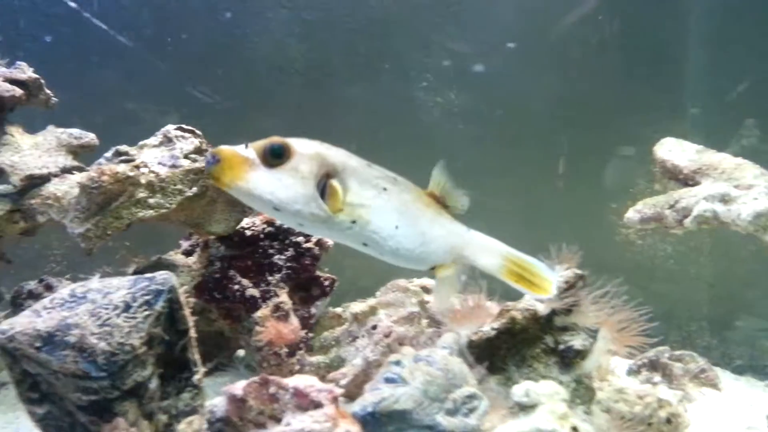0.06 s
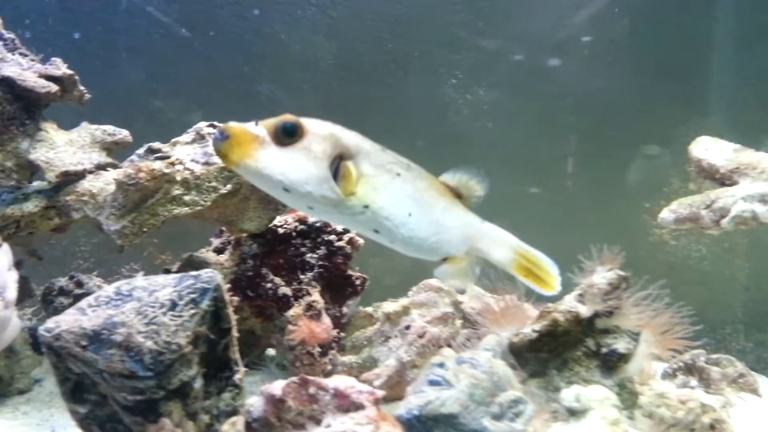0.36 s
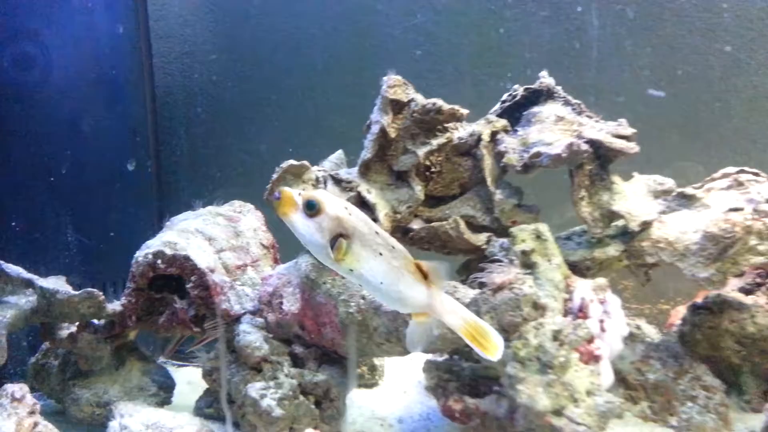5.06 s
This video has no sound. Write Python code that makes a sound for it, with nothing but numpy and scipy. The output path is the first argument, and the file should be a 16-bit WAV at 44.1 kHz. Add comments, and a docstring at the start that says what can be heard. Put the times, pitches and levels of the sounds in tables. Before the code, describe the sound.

Close to a fish tank, running water bubbles and splashes lightly onto the surface while a pump hums softly underneath.

```python
"""A small room with an aquarium, heard close to the glass. The circulation pump hums at harmonics of the
mains. Return water churns and gulps in the overflow and trickles onto the surface, where each trapped
bubble rings as a damped oscillator: a steady fizz, with a louder plip or a bright spatter now and then.
The space under the hood resonates, the panes reflect and the room adds a short reverberation."""
import sys
import numpy as np
from scipy import signal
from scipy.fft import rfft, irfft, next_fast_len
from scipy.io import wavfile
from scipy.ndimage import map_coordinates

SR = 44100
rng = np.random.default_rng(int(sys.argv[2]) if len(sys.argv) > 2 else 0)


def dump(signal):
    """Clip the signal to [-1, 1] and save it as 16-bit WAV at the path in sys.argv[1]."""
    limited = np.clip(np.atleast_2d(signal).T, -1, 1)
    pcm = np.round(limited * 32767).astype(np.int16)
    wavfile.write(sys.argv[1], SR, pcm)


N = 293794
TIME = np.arange(N) / SR
START_S = 0.542  # the sound begins

# spectrum of fizz ringing the narrow space under the hood: f/Hz, level/dB
FIZZ_SPECTRUM = [(2500, -14), (4300, -5), (4880, -3), (5060, 5), (5220, 6), (5400, -2), (5750, -2),
                 (6000, -1), (6200, 5), (6430, 3), (6650, -6), (6950, -9), (7200, -5), (7550, -11),
                 (10000, -14)]


def amp(db):
    """Decibels to amplitude ratio."""
    return 10 ** (np.asarray(db) / 20)


def unit(x):
    """Normalisation to rms 1."""
    return x / np.sqrt(np.mean(x ** 2) + 1e-20)


def along(points, hz):
    """Interpolation of (f/Hz, value) points on a logarithmic frequency axis."""
    f, v = np.transpose(points)
    return np.interp(np.log(hz + 1), np.log(f + 1), v)


def wobble(rate):
    """Smooth random modulation, with rate knots a second."""
    return map_coordinates(rng.standard_normal(int(N * rate / SR) + 4), [TIME * rate])


def filtered(x, response):
    """Linear filtering: the spectrum of x times a frequency response."""
    size = next_fast_len(N + SR // 2)
    return irfft(rfft(x, size) * response(np.fft.rfftfreq(size, 1 / SR)), size)[..., :N]


def add(track, s, sound):
    """Superposition of a sound on the track at time s."""
    part = track[:, round(s * SR):][:, :sound.shape[1]]
    part += sound[:, :part.shape[1]]


def in_tank(x, spectrum):
    """Cavity resonance: x is shaped by a spectrum with a peak added at each mode; rms 1."""
    # modes of the overflow pipe and the air under the hood: f/Hz, width/Hz, lift/dB
    modes = [(325, 18, 5), (725, 70, 2), (1020, 70, 3), (2120, 65, 7), (3495, 45, 5), (3780, 90, 3),
             (5150, 150, 5), (6230, 130, 5)]
    lift_db = lambda f: sum(db / (1 + (2 * (f - hz) / width) ** 2) for hz, width, db in modes)
    return unit(filtered(x, lambda f: amp(along(spectrum, f) + lift_db(f))))


def echoes(early_t60, room_db):
    """Stereo impulse response: dense reflections from the glass and the room's exponential decay."""
    # reverberation time of the room: f/Hz, T60/s
    room_t60 = [(200, 0.35), (3500, 0.24), (12000, 0.13)]
    size = SR // 4
    early = rng.standard_normal((2, size)) * amp(-60 * TIME[:size] / early_t60)
    hz, t, noise = signal.stft(rng.standard_normal((2, size)), SR, nperseg=256)
    decay = amp(-60 * t / along(room_t60, hz)[:, None])
    tail = signal.istft(noise * decay, SR, nperseg=256)[1][:, :size]
    return unit(unit(early) + amp(room_db) * unit(tail)) / np.sqrt(size)


def bubble(hz, cycles, rise, t):
    """Damped oscillation: a bubble decays by 1/e in the given cycles, its pitch rising near the surface."""
    age = hz * t / cycles
    return np.exp(-age) * np.sin(2 * np.pi * hz * t * (1 + rise * np.minimum(age, 10) / 2))


def bubbles(count, low_hz, high_hz, cycles, rise, spread_db, size):
    """Incoherent sum of bubbles of random onset, pitch and strength, each size samples long; rms 1."""
    when, pitch, strength = rng.random((count, 3)).T
    hz = low_hz * (high_hz / low_hz) ** pitch
    gain = amp(-spread_db * np.log(strength + .02)) * hz / high_hz
    rings = gain[:, None] * bubble(hz[:, None], cycles, rise, TIME[:size])
    index = (when * N).astype(int)[:, None] + np.arange(size)
    return unit(np.bincount(index.ravel(), rings.ravel(), N)[:N])


def pump(mains_hz=60):
    """Harmonic series: a low mains hum whose partials waver, the 180 and 240 Hz tones slowly fading."""
    # partials of the hum: harmonic number, level/dB, waver/dB, drift/(dB/s)
    harmonics = [(1, -76.5, 3, 0), (2, -54.5, 0, -0.06), (3, -55.5, 1, -0.7), (4, -50.5, 2, -0.8),
                 (5, -77, 3, 0.5)]
    hum = np.zeros(N)
    for k, db, waver_db, drift_db in harmonics:
        peak = np.sqrt(2) * amp(db + drift_db * TIME + waver_db * wobble(5.014))
        hum += peak * np.sin(2 * np.pi * (k * mains_hz * TIME + rng.random()))
    return hum


def churn(level_db):
    """Turbulent noise and large bubbles in the overflow; the bass is coherent at the two ears."""
    # spectrum of the rumble: f/Hz, level/dB
    spectrum = [(20, -33), (36, -25), (55, -19), (80, -15), (100, -4.5), (160, 2), (320, 0), (410, -0.5),
                (500, -6), (720, -9.5), (850, -15), (1100, -14.5), (2000, -19), (5000, -37)]
    # likeness of left and right: f/Hz, correlation
    coherence = [(120, 0.9), (240, 0.93), (420, 0.71), (520, 0.6), (900, 1), (1400, 0.045)]
    glugs = [bubbles(count=1200, low_hz=146, high_hz=1188, cycles=3.3, rise=0.027, spread_db=2, size=1800)
             for _ in range(2)]
    pair = rng.standard_normal((2, N)) + amp(-20) * np.array(glugs)
    angle = lambda f: np.arccos(np.clip(along(coherence, f), -1, 1)) / 2
    mid, side = filtered(pair, lambda f: np.array([np.cos(angle(f)), np.sin(angle(f))]))
    return amp(level_db + 0.1 * wobble(14)) * in_tank(np.array([mid + side, mid - side]), spectrum)


def trickle(level_db):
    """Air entrainment: the stream drags bubbles under at three spots, each with its own reflections."""
    # spectrum of the trickle: f/Hz, level/dB
    spectrum = [(200, -23), (600, 0), (1000, 1.5), (1500, -1.5), (2200, -2), (2650, -4), (3200, -1),
                (3900, 1.5), (5200, -5), (6800, -9.5), (9000, -12), (14500, -17)]
    water = np.zeros((2, N))
    for _ in range(3):
        swarm = bubbles(count=4000, low_hz=596, high_hz=12060, cycles=4.24, rise=0.027,
                        spread_db=2, size=400)
        swarm *= amp(1.07 * wobble(14))
        water += signal.fftconvolve(swarm[None], echoes(early_t60=0.079, room_db=1), axes=1)[:, :N]
    return amp(level_db) * in_tank(water, spectrum)


def fizz(level_db):
    """Bubble resonance: tiny bubbles ring high and without pause where the stream lands, to the right."""
    swarm = bubbles(count=2400, low_hz=3870, high_hz=7300, cycles=1.6, rise=0.011, spread_db=4, size=200)
    water = signal.fftconvolve(swarm[None], echoes(early_t60=0.061, room_db=-10), axes=1)[:, :N]
    return amp(level_db) * unit(filtered(water, lambda f: amp(along(FIZZ_SPECTRUM, f)))) * amp([[-1], [1]])


def spray(level_db):
    """Film rupture: bursting foam gives a fine crackle over an even hiss."""
    # spectrum of the spray: f/Hz, level/dB
    spectrum = [(500, -3), (2000, 6), (5000, -7.5), (8000, -1), (10000, -5), (12500, -4), (14500, -7)]
    crackle = [bubbles(count=2500, low_hz=4250, high_hz=14000, cycles=2.8, rise=0, spread_db=1.5, size=64)
               for _ in range(2)]
    hiss = rng.standard_normal((2, N)) + amp(-8) * np.array(crackle)
    return amp(level_db) * unit(filtered(hiss, lambda f: amp(along(spectrum, f))))


def plips(faint):
    """Drop impact: each drop splashes and traps one bubble; direct sound precedes the panes' scatter."""
    # loudest drops: t/s, level/dB, f/Hz, left over right/dB, scatter over direct/dB, splash over ring/dB
    loud = [(.5725, -16, 5000, -3, 3, 6.5), (.660, -17.5, 2220, 4, 5, -4), (.7195, -17.5, 4100, 3.5, -1, 7),
            (.7599, -15.5, 4320, -2, 0, -1), (.777, -24, 3470, 7, 1, -4), (.805, -15.5, 4350, -6, 2, -1),
            (.9966, -27, 3700, 5, -5, 4), (1.2363, -18.5, 3500, 11, 2, 1), (1.3698, -20.5, 3370, 4, 3, -2),
            (1.3905, -17.5, 3600, 8, -1, -1), (1.4822, -16, 3900, 9, 3, 2), (1.7494, -25, 3460, 0, 7, 0),
            (1.800, -20.5, 2150, 3, 2, -3), (1.8274, -19, 4030, 7, 0, 1), (1.939, -20.5, 3330, 10, 1, 3),
            (2.0394, -19, 4730, -5, 8, 0), (2.1218, -18.5, 3750, 9, 2, -4), (2.5135, -17.5, 3880, 8, 2, 6),
            (2.5403, -18.5, 4000, 1, 8, 8), (2.6396, -15.5, 3450, 11, 4, -1), (2.663, -23, 4300, 0, 8, 6),
            (2.686, -17, 3260, 8, 8, 7), (2.7035, -19, 4600, -2, 2, 2), (2.7079, -13, 3460, 11, -3, -3),
            (2.7118, -16.5, 3800, 11, -2, 1), (2.7174, -15, 3480, 9, -4, -7),
            (2.7255, -16, 3480, 1, -3, -4), (2.9594, -27, 3470, 11, -1, 0), (3.3233, -27, 4140, 4, 3, -2),
            (3.6852, -20, 3750, 14, -1, -6), (3.876, -21.5, 3000, 7, 5, 6), (3.885, -21.5, 2000, -4, 5, 0),
            (3.9606, -19.5, 3380, 13, 1, -2), (4.1058, -15, 3750, 17, -3, -18),
            (4.115, -19, 3700, -2, 4, -12), (4.2639, -24, 4130, 8, 0, -2), (4.3258, -20.5, 4060, 2, 2, -3),
            (4.5298, -24.5, 4050, 9, -3, -3), (4.715, -24, 3400, 6, 3, -2),
            (4.7907, -16.5, 3780, 16, 0, -3), (4.8225, -14.5, 3730, 12, 2, -2), (4.930, -24, 3500, 5, 5, 2),
            (5.072, -23, 2850, -1, 8, -8), (5.092, -24, 2850, 2, 10, -5), (5.1738, -23, 3450, 9, 5, -6),
            (5.198, -23, 4000, 6, 4, -5), (5.4063, -24, 3730, 12, 0, -2), (5.5824, -19.5, 3900, 11, 5, -1),
            (5.684, -23, 4300, 7, 6, 3), (6.138, -25.5, 3650, 5, 3, -3), (6.2617, -25, 2860, 5, 1, -5),
            (6.282, -23, 4400, 2, 3, -3), (6.3926, -17.5, 3750, 8, 3, -4), (6.399, -23, 4150, 6, 5, -6)]
    # filter of the splash: f/Hz, level/dB
    splash_spectrum = [(700, -16), (2000, -3), (3600, -1.5), (5200, 0.5), (6200, -3.5), (10000, -4)]
    neck_s, pane_s = 0.00093, 0.0038  # swell as the bubble's neck closes; delay from the nearest pane
    track, t = np.zeros((2, N)), TIME[:1600]
    colour = amp(along(splash_spectrum, np.fft.rfftfreq(len(t), 1 / SR)))
    for s, db, hz, pan_db, wet_db, splash_db in loud + faint:
        ring = unit(bubble(hz, cycles=2.4, rise=0.0071, t=t) * (1 - np.exp(-t / neck_s)) ** 2)
        impact = np.roll(bubble(hz, cycles=0.6, rise=0, t=t), len(t) // 40)
        tick = irfft(rfft(impact) * colour)
        burst = rng.standard_normal(len(t)) * amp(-60 * t / 0.026)
        splash = unit(np.convolve(tick, burst)[:len(t)])
        direct = ring + amp(splash_db) * splash
        scatter = signal.fftconvolve(direct[None], echoes(early_t60=0.058, room_db=-3), axes=1)
        scatter /= np.linalg.norm(scatter, axis=1, keepdims=True)
        sides = amp(pan_db * np.array([[.5], [-.5]]))
        gain = amp(db) / np.hypot(1, amp(wet_db))
        add(track, s, gain * unit(sides) * direct / np.linalg.norm(direct))
        add(track, s + pane_s, gain * amp(wet_db) * unit(sides ** 0.56) * scatter)
    return track


def faint_drops(flow_db, count, wet_db=10, splash_db=5):
    """Random dripping: rows for plips() of small drops at uneven intervals, harder in a strong flow."""
    when = START_S + (TIME[-1] - START_S) * (np.arange(count) + rng.random(count)) / count
    softness, pitch, side = np.clip(rng.standard_normal((count, 3)).T, -2, 2)
    db = -27.5 + np.interp(when, TIME, flow_db) - 0.5 * softness
    hz = 3840 + 580 * pitch
    pan_db = 7 + 7 * side
    return [(*drop, wet_db, splash_db) for drop in zip(when, db, hz, pan_db)]


def spurts(swell_s=0.002, width_hz=1350, gain_db=19):
    """Impulsive excitation: the stream slaps the surface and like-sized bubbles ring the hood's cavity."""
    # slaps of the stream: t/s, relative level/dB, centre f/Hz
    slaps = [(0.6334, -43, 5100), (0.6714, -42, 6220), (0.9054, -40, 5040), (0.9584, -40, 5160),
             (0.9784, -47, 6240), (0.9944, -42, 5120), (1.075, -41, 6230), (1.1134, -40, 6390),
             (1.1884, -42, 5120), (1.2744, -45, 6150), (1.3114, -37.5, 5030), (1.3513, -44, 5170),
             (1.4506, -43, 6330), (1.4795, -39, 5950), (1.4994, -48, 6230), (1.5434, -39, 4940),
             (1.6162, -43.5, 5360), (1.6516, -43, 5930), (1.7434, -45, 5190), (2.1234, -47, 5390),
             (2.2034, -46, 5040), (2.2334, -48, 5700), (2.2744, -43, 5030), (2.4339, -44, 5280),
             (2.5406, -48, 4940), (2.7734, -45, 5510), (2.8464, -43, 5040), (2.9734, -43, 5120),
             (3.1462, -44, 5130), (3.2425, -44, 5190), (3.454, -49, 5160), (3.676, -46, 5260),
             (3.7045, -43.5, 5110), (3.7764, -44, 5110), (3.9934, -48, 5330), (4.0502, -48, 6250),
             (4.2637, -44, 5050), (4.338, -49, 5060), (4.4534, -51, 5150), (4.5234, -52, 5490),
             (4.8239, -46, 5140), (4.9147, -45, 5450), (5.0474, -48, 5500), (5.2434, -53, 5060),
             (5.3434, -49, 5030), (5.5508, -49, 5060), (5.6774, -50, 5010), (5.7628, -45, 5090),
             (5.8944, -51, 5120), (6.0184, -41.5, 5150), (6.0774, -45, 5800), (6.1534, -52, 5050),
             (6.1804, -44, 5050), (6.3584, -42.5, 5080), (6.4944, -46, 5140)]
    track, size = np.zeros((2, N)), SR // 4
    f, age = np.fft.rfftfreq(size, 1 / SR), TIME[:size] / swell_s
    for s, db, hz in slaps:
        pops = rng.standard_normal(size) ** 3 * age * np.exp(-age)  # cubing makes the noise spiky
        colour = amp(along(FIZZ_SPECTRUM, f)) / (1 + 2j * (f - hz) / width_hz)
        sound = irfft(rfft(pops) * colour * rfft(echoes(early_t60=0.053, room_db=-4)), size)
        add(track, s, amp(db + gain_db) * unit(sound) / np.sqrt(size) * amp([[-1], [1]]))
    return track


def gulps(length_s=0.09, climb_octaves=0.1, scatter_octaves=0.49):
    """Air ingestion: the overflow swallows a string of large, low bubbles, climbing a little in pitch."""
    # gulps of air: centre t/s, level/dB, f/Hz
    swallows = [(.90, -17, 401), (1.24, -14, 320), (1.43, -15.5, 385), (1.48, -13, 225), (2.33, -15, 206),
                (4.10, -13, 199), (5.71, -21, 512), (5.775, -13.5, 401), (5.84, -16, 193)]
    track, t = np.zeros((2, N)), TIME[:4000]
    for s, db, hz in swallows:
        string, chance = np.zeros((1, SR // 4)), rng.random(size=(14, 2))
        for step, (late, detune) in enumerate(chance):
            place = (step + late) / len(chance)
            pitch = hz * 2 ** (climb_octaves * (place - .5) + scatter_octaves * (detune - .5))
            ring = bubble(pitch, cycles=3.3, rise=0.015, t=t) * (1 - np.exp(-t / 0.004))
            add(string, place * length_s, np.sin(np.pi * place) * ring[None])
        add(track, s - length_s / 2, amp(db) * string / np.linalg.norm(string))
    return track


def spatters():
    """Impact noise: fine drops land in a bright burst, a tick spread out by dense reflections."""
    # bursts of fine drops: t/s, level/dB
    bursts = [(2.279, -27), (3.9594, -27), (5.001, -25), (5.1931, -22.5), (5.764, -27), (6.0794, -27)]
    track = np.zeros((2, N))
    tick = bubble(7900, cycles=0.98, rise=0, t=TIME[:100])
    for s, db in bursts:
        sound = signal.fftconvolve(tick[None], echoes(early_t60=0.094, room_db=12), axes=1)
        add(track, s, amp(db) * sound / np.linalg.norm(sound[0]))
    return track


def scene():
    """Superposition: one flow drives the running water, with the pump under it and single drops on top."""
    # return flow, strong at first, then settling: t/s, level over the settled flow/dB
    flow = [(0.55, 3), (1.55, 3), (1.75, 2), (2.2, 3), (2.4, 0), (2.7, 2.5), (3.3, -2), (4.1, 0),
            (6.6, -0.3)]
    # stereo balance: f/Hz, left over right/dB
    balance = [(120, -0.5), (240, 2.5), (330, 0), (1500, 0.5), (2700, 2.5), (3600, 2), (4400, 0.5),
               (5100, -3.5), (6200, 2.5), (7800, 4.5), (11000, 1), (14000, 1)]
    flow_db = np.interp(TIME, *np.transpose(flow))
    water = (churn(-47.5 + 0.48 * flow_db) + trickle(-50.5 + 0.57 * flow_db)
             + fizz(-66 + 2.2 * flow_db) + spray(-57 + 0.38 * flow_db))
    lean = lambda f: amp(np.outer([.5, -.5], along(balance, f)))
    circulation = filtered(pump() + gulps() + spurts() + water, lean)
    return circulation + plips(faint_drops(flow_db, count=30)) + spatters()


def record(dry):
    """Gating and band limiting: the sound opens after a moment of silence, its highest treble cut off."""
    fade_s, top_hz = 0.002, 14650
    opened = np.clip((TIME - START_S) / fade_s, 0, 1)
    return filtered(dry * opened, lambda f: f < top_hz)


dry = scene()
out = record(dry)
dump(out)
```